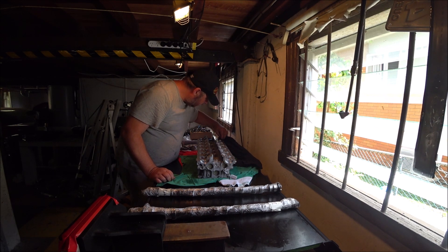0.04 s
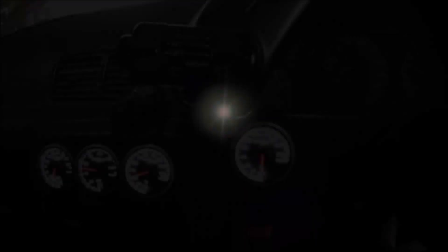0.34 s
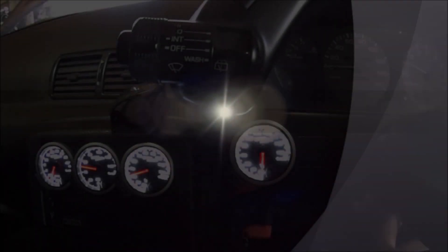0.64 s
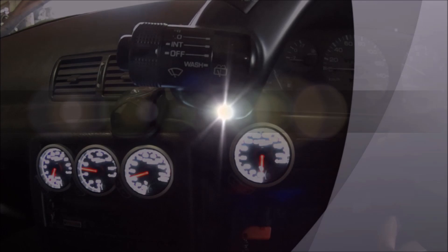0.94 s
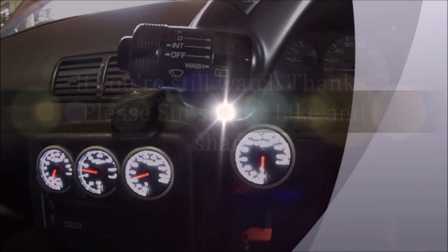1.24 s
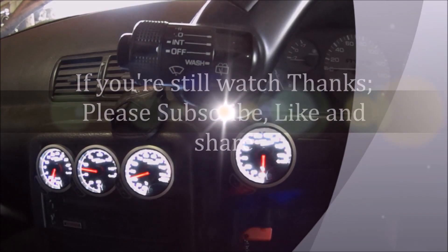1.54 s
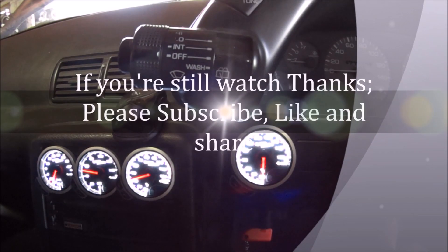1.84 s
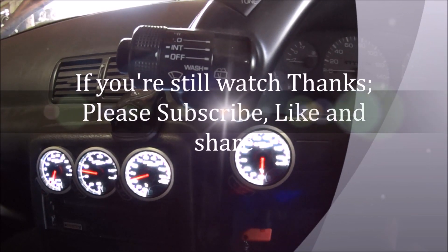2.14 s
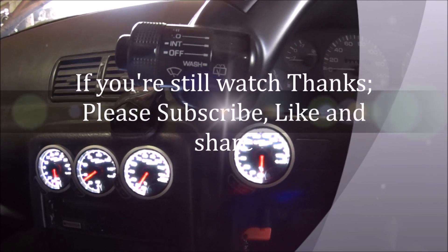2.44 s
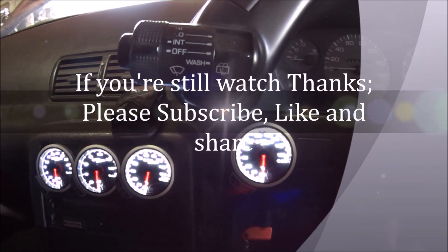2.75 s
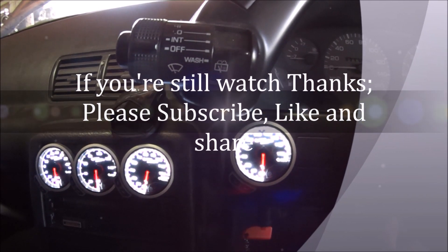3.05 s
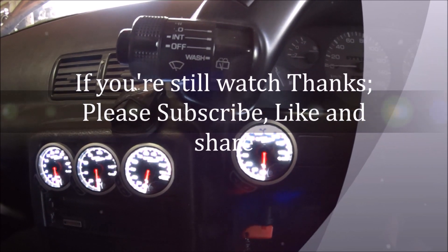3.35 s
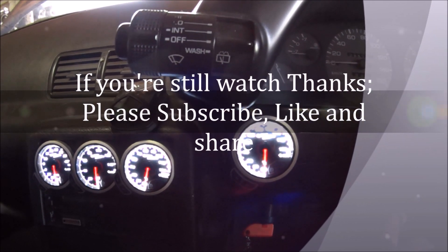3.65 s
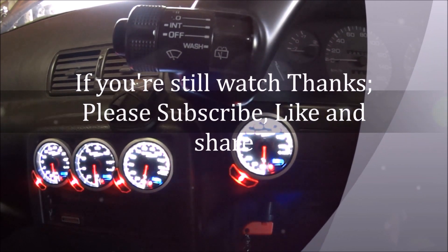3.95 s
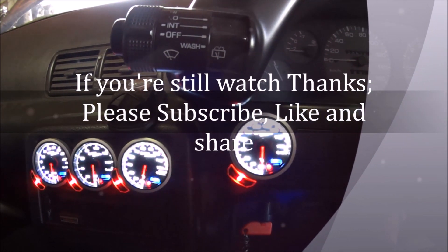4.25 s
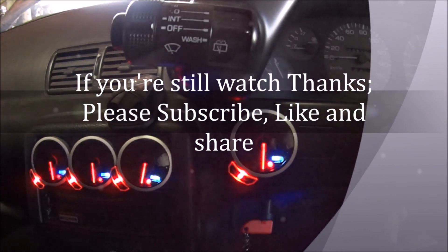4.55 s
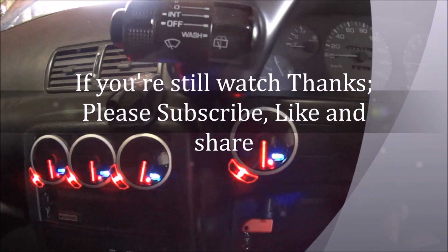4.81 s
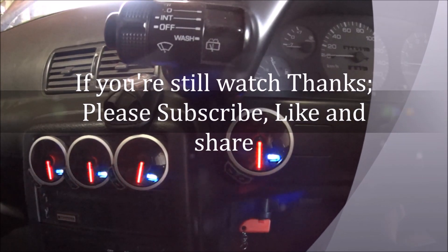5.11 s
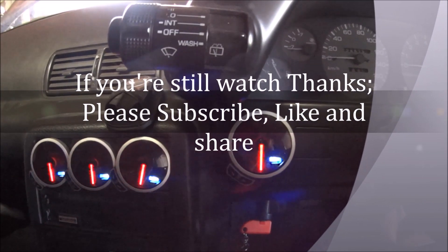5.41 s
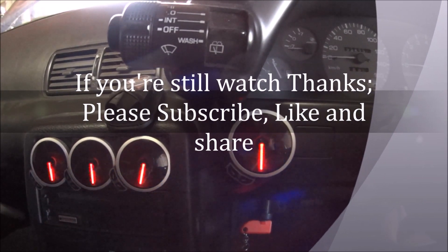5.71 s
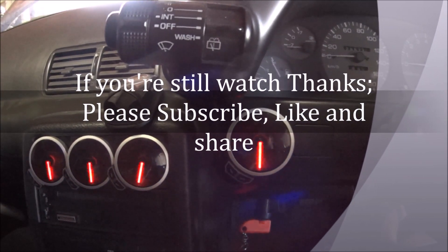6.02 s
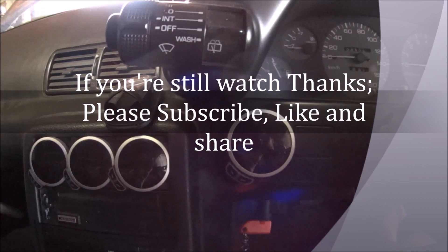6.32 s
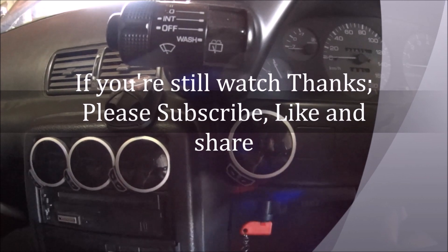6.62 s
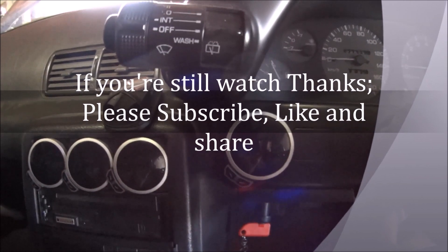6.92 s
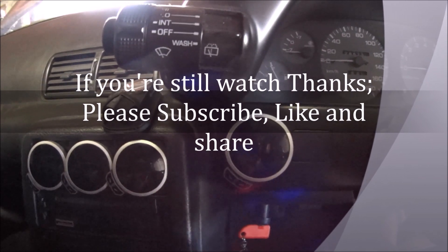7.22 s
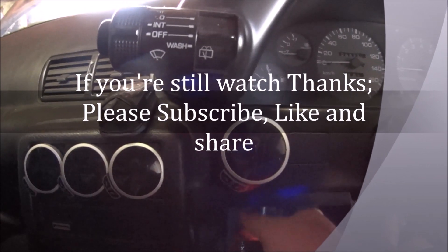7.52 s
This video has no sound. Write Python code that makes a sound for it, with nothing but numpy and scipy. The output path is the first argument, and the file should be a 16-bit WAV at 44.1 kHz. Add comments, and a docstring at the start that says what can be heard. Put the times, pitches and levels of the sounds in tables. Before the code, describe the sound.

A car engine idles, then shudders to a stop as it is switched off; the ignition clicks and hanging keys jangle.

```python
"""Switching off a parked car

Inside the cabin, after a faint hiss and a short silence, a six-cylinder engine idles. The key turns,
firing stops, and speed, clatter and intake hiss fall together as the engine shudders to rest.
The lock clicks through its notches, hanging keys jangle, trim creaks, a sleeve rustles, a relay ticks
and a latch clacks, over a faint hum from outside."""
import sys
import numpy as np
from scipy import signal
from scipy.fft import rfft, irfft
from scipy.io import wavfile
from scipy.ndimage import uniform_filter1d, map_coordinates

SR = 44100
rng = np.random.default_rng(int(sys.argv[2]) if len(sys.argv) > 2 else 0)


def store_wav(level_fs):
    """Save 16-bit WAV to argv[1]."""
    pcm = np.round(np.clip(np.atleast_2d(level_fs), -1, 1) * 32767)
    wavfile.write(sys.argv[1], SR, pcm.T.astype(np.int16))


N = 338158
TIME, HZ = np.arange(N) / SR, np.fft.rfftfreq(N, 1 / SR)
KEY_OFF_S, COAST_START_S, REST_S = 2.11, 2.148, 3.28
SETTLE_S = 0.34  # jolts and whir fade over this last stretch before rest

# engine balance at the ears: (frequency [Hz], left minus right [dB])
EAR_BALANCE = [(60, -2), (110, -9), (190, -2), (340, -5), (610, 2), (1090, -1.5), (1940, -2), (3460, -3.5),
               (6180, -2.0), (11000, -1)]
# engine phase at the ears: (frequency [Hz], left lead [rad])
EAR_LEAD = [(20, 2), (58, 0.79), (120, -0.7), (215, 1.5), (430, 1.23), (1120, 1.26), (2760, 0.62),
            (4130, -0.8), (11000, -1.3)]


def amp(db):
    """Decibels to gain."""
    return 10 ** (np.asarray(db) / 20)


def rms(x):
    """Root mean square, never zero."""
    return np.sqrt(np.mean(x ** 2) + 1e-20)


def unit(x):
    """Scale to rms 1."""
    return x / rms(x)


def read(points, hz):
    """Interpolate on a log-frequency axis."""
    f, value = np.transpose(points)
    return np.interp(np.log(hz + 1), np.log(f + 1), value)


def humps(peaks):
    """Resonance peaks as a spectrum in dB."""
    return sum(db / (1 + (2 * (HZ - hz) / width_hz) ** 2) for hz, width_hz, db in peaks)


def envelope(points):
    """Smoothed gain from a dB curve, silent outside its span."""
    s, db = np.transpose(points)
    return uniform_filter1d(np.interp(TIME, s, amp(db), left=0, right=0), size=400)


def swells(moves):
    """Summed gain of movements, each a linear rise and fall."""
    return sum(amp(db) * np.clip(np.minimum((TIME - s) / rise_s, 1 - (TIME - s - rise_s) / fall_s), 0, 1)
               for s, rise_s, fall_s, db in moves)


def add(mix, s, sound):
    """Mix a stereo sound in at time s."""
    part = mix[:, round(s * SR):][:, :sound.shape[1]]
    part += sound[:, :part.shape[1]]


def drift(hz):
    """Random wander of rms 1, up to about the given rate."""
    return unit(irfft(rfft(rng.standard_normal(N)) * np.exp(-(HZ / hz) ** 2), N))


def noise(shape_db, coherence, balance_db=0, lead_rad=0):
    """Shaped stereo noise; its mid has rms 1."""
    left, other = rfft(rng.standard_normal((2, N)))
    coherence = np.clip(coherence, -1, 1)
    right = coherence * left + np.sqrt(1 - coherence ** 2) * other
    pan = amp(balance_db / 2) * np.exp(.5j * lead_rad)
    pair = irfft(np.array([left * pan, right / pan]) * amp(shape_db), N)
    return pair / rms(pair.mean(0))


def burst(lo_hz, hi_hz, t60_s):
    """Decaying band of contact noise, nearly alike at both ears."""
    t = np.arange(SR // 2) / SR
    band = signal.butter(2, [lo_hz, min(hi_hz, SR / 2 - 1)], "band", fs=SR, output="sos")
    mid, side = unit(signal.sosfilt(band, rng.standard_normal((2, len(t)))))
    pair = np.array([mid + 0.36 * side, mid - 0.36 * side])
    return pair * amp(-60 * t / t60_s) * (1 - np.exp(-t / 0.00068))


def ring(modes, scatter_db=2, spread_rad=0.93, rise_s=.0011):
    """Decaying modes; each blow lands elsewhere and weights them differently."""
    t = np.arange(SR // 2) / SR
    out = np.zeros((2, len(t)))
    for hz, db, t60_s in modes:
        phase = 2 * np.pi * rng.random() + spread_rad * rng.standard_normal((2, 1))
        decay = amp(db + scatter_db * rng.standard_normal() - 60 * t / t60_s)
        out += decay * np.sin(2 * np.pi * hz * t + phase)
    return out * (1 - np.exp(-t / rise_s))


def opening_hiss(end_s=.267):
    """Faint, wide hiss that cuts off."""
    # hiss spectrum: (frequency [Hz], relative density [dB])
    spectrum = [(35, -62), (60, -21), (351, -13), (383, -5), (427, -8), (804, -6.5), (957, -9), (1110, -5),
                (11000, -17), (14300, -40), (22000, -120)]
    return amp(-63) * noise(read(spectrum, HZ), coherence=0.12) * (TIME < end_s)


def halvings(s, tau_s=.66):
    """Times the crank speed has halved by time s; friction slows it exponentially."""
    return (np.clip(s, COAST_START_S, REST_S) - COAST_START_S) / tau_s / np.log(2)


def crank_order(k, turns, crank_hz, offset_cycles):
    """Harmonic k of the crank, reaching the ears through the cabin's standing waves."""
    hz = k * crank_hz
    pan = amp(read(EAR_BALANCE, hz) / 2) * np.exp(.5j * read(EAR_LEAD, hz))
    return (np.array([pan, 1 / pan]) * np.exp(2j * np.pi * (k * turns + offset_cycles))).real


def idle(turns, crank_hz, roughness=.028):
    """Firing orders; unequal firings and surging turns blur the high ones most."""
    # idle harmonics: (order [x crank speed], relative level [dB])
    orders = [(2, -24), (3, 0), (4, -21), (5, -22), (6, -14.5), (8, -28), (9, -16), (10, -23), (11, -8),
              (12, -5.8), (13, -16.5), (15, -28), (16, -27), (17, -29), (18, -20), (19, -24), (21, -23),
              (23, -28), (24, -24), (33, -26)]
    surge = drift(11)
    out = np.zeros((2, N))
    for k, db in orders:
        flutter = 1 + roughness * np.sqrt(k) * (drift(33) + surge)
        out += amp(db) * flutter * crank_order(k, turns, crank_hz, rng.random())
    return amp(-31) * out / rms(out.mean(0))


def clatter_and_intake(turns, bleed_start_s=2.84, bleed_s=1):
    """Pulsing clatter and intake hiss fall with speed, then fade as the last air bleeds in."""
    # clatter through the bulkhead: (frequency [Hz], relative density [dB])
    clatter_spectrum = [(12, -25), (26, 5), (45, -2), (66, 5), (90, -3), (125, -5), (170, -5), (240, 2),
                        (272, -3), (320, 2), (385, 1.5), (425, -3), (500, -2), (700, -1.5), (1000, -8),
                        (1800, -12.5), (3000, -20), (5500, -38)]
    # intake air: (frequency [Hz], relative density [dB])
    hiss_spectrum = [(2000, -16), (3300, -2), (4300, -2), (5800, 0), (7200, -4), (10400, -15), (12000, -28)]
    # body panel resonances: (frequency [Hz], width [Hz], boost [dB])
    panels = [(204, 18, 13), (640, 60, 3), (750, 45, 4), (1755, 60, 6.5), (2210, 70, 2), (5500, 400, 2),
              (6380, 90, 3), (6870, 90, 3)]
    # left-right likeness: (frequency [Hz], coherence [0-1])
    coherence = [(60, 0.72), (130, 0.84), (270, 0.82), (560, 0.97), (1180, 0.8), (2490, 0.5), (5240, 0.91),
                 (11000, 1)]
    ears = read(coherence, HZ), read(EAR_BALANCE, HZ), read(EAR_LEAD, HZ)
    slowed = halvings(TIME)
    pulse = 1 + 0.052 * np.cos(2 * np.pi * 3 * turns) + 0.05 * np.cos(2 * np.pi * 2 * turns)
    clatter = noise(read(clatter_spectrum, HZ) + humps(panels), *ears) * amp(-40 - 10.5 * slowed)
    hiss = noise(read(hiss_spectrum, HZ) + humps(panels), *ears) * amp(-57.5 - 4.5 * slowed)
    return (clatter * pulse + hiss) * np.clip(1 - (TIME - bleed_start_s) / bleed_s, 0, 1)


def engine(idle_stroke_hz=57.8, wander=.002, stumble=0.03, firing_fade_s=0.09):
    """Six cylinders, three strokes a turn: fires until key-off, then coasts ever more unevenly."""
    slowed = halvings(TIME)
    stroke_hz = idle_stroke_hz / 2 ** slowed * (1 + wander * drift(3.64) + stumble * slowed * drift(15.7))
    strokes = np.cumsum(stroke_hz) / SR
    turns, crank_hz = strokes / 3, stroke_hz / 3
    firing = np.clip(1 - (TIME - KEY_OFF_S) / firing_fade_s, 0, 1)
    fired = idle(turns, crank_hz) * firing
    unfired = (compression(turns, crank_hz) + whir(turns, crank_hz)) * np.sqrt(1 - firing ** 2)
    return fired + unfired + clatter_and_intake(turns) + shudder(strokes)


def background(settle_db_per_s=16.5):
    """Hollow cabin quiet and a low rumble that settles as the body stops rocking."""
    # cabin quiet: (frequency [Hz], relative density [dB])
    spectrum = [(20, -42), (55, -4.5), (85, -9), (120, -3), (155, -15), (195, -5.5), (280, -15), (420, -16),
                (520, -13), (630, -13), (800, -16), (1300, -21), (2500, -26), (6000, -29.5), (11000, -36.5),
                (13000, -96)]
    # its resonances: (frequency [Hz], width [Hz], boost [dB])
    hollow = [(635, 36, 7), (4260, 80, 7)]
    # left-right likeness: (frequency [Hz], coherence [0-1])
    coherence = [(60, 0.98), (170, 1), (480, 0.55), (1370, 0.024), (3890, 0.065), (11000, 0.74)]
    rumble_db = read([(10, -18), (25, -15), (46, 1), (70, -41), (140, -16), (400, -80)], HZ)
    rocking = amp(-62 - settle_db_per_s * np.maximum(TIME - REST_S, 0))
    rumble = noise(rumble_db, coherence=1) * np.hypot(amp(-77.5), rocking)
    return rumble + amp(-63) * noise(read(spectrum, HZ) + humps(hollow), read(coherence, HZ))


def click(treble_db, middle_db, low_db, t60_s, treble_hz=5300):
    """Contact of small hard parts, in three noise bands."""
    treble = amp(treble_db) * burst(treble_hz / 1.7, treble_hz * 1.7, t60_s)
    return treble + amp(middle_db) * burst(1220, 3060, t60_s) + amp(low_db) * burst(330, 1140, t60_s)


def barrel(centre_hz):
    """The lock barrel rings most in the modes near the blow's centre frequency."""
    # barrel modes: (frequency [Hz], level [dB], t60 [s])
    modes = [(1250, -13, .09), (1772, 0.5, 0.068), (2825, 0, 0.044), (4390, -2.5, 0.049), (4660, -13, .025),
             (4980, -4, .035), (5830, -8, 0.031), (6090, -1, 0.029), (6680, -3, 0.033), (7270, -5, .036),
             (10620, -1.5, 0.03)]
    excited = [(hz, db - 6 * np.log2(hz / centre_hz) ** 2, t60_s) for hz, db, t60_s in modes]
    return ring(excited, scatter_db=-1, spread_rad=0.21)


def lock(seat_delay_s=0.0029):
    """The pin snaps into each notch, rings the barrel, seats with a duller blow and rattles in its slack."""
    # notches: (time [s], snap [dB], snap centre [Hz], seating [dB], ringing [dB], t60 [s])
    notches = [(2.1006, -28.5, 9200, -38, -40, 0.062), (2.613, -41.5, 7400, -66, -56, 0.08),
               (3.4245, -33.5, 4300, -38, -29.5, 0.084), (4.5654, -30.5, 6000, -44.5, -33, 0.033),
               (4.8151, -46, 5740, -42.5, -44, 0.056)]
    # catches and rebounds of the pin: (time [s], level [dB], centre [Hz])
    slack = [(2.088, -39.5, 9500), (3.4058, -47.5, 5200), (3.456, -44, 4000), (4.803, -54, 6500),
             (4.836, -50.5, 4400), (4.846, -51, 5000)]
    out = np.zeros((2, N))
    for s, snap_db, hz, seat_db, ring_db, t60_s in notches:
        snap = click(snap_db - 2, snap_db - 14, snap_db - 21, t60_s, hz)
        add(out, s, snap + amp(ring_db) * barrel(hz))
        add(out, s + seat_delay_s, click(seat_db - 2, seat_db, seat_db - 9, t60_s))
    for s, db, hz in slack:
        add(out, s, click(db - 2, db - 9, db - 21, t60_s=0.06, treble_hz=hz) + amp(db - 6) * barrel(hz))
    return out


def compression(turns, crank_hz, imbalance_db=-17, roughness=.22):
    """Harmonics of the unfired strokes sweep down through the cabin's deepest boom."""
    # stroke strength: (time [s], level [dB])
    strength = [(2.13, -32), (2.2, -27), (2.29, -27.5), (2.35, -34.5), (2.45, -36), (2.55, -29.5),
                (2.72, -35.5), (2.84, -44), (2.95, -45.5), (3.08, -57), (3.3, -72)]
    # cabin response: (frequency [Hz], gain [dB])
    response = [(12, -8), (18, 1), (26, 1), (36, 2.5), (46, 7.5), (56, 9.5), (66, 6), (80, -3), (100, -11),
                (120, -14), (200, -28), (400, -45)]
    out, power = np.zeros((2, N)), 0
    for k in range(2, 19):
        between = k % 3 != 0  # unlike cylinders add orders between the stroke harmonics
        gain = amp(read(response, k * crank_hz) + (imbalance_db if between else 0))
        flutter = 1 + roughness * drift(18)
        out += gain * flutter * crank_order(k, turns, crank_hz, rng.random() if between else 0)
        power += gain ** 2 / 2
    return out * envelope(strength) / np.sqrt(power)


def whir(turns, crank_hz, roughness=0.37):
    """Orders of the coasting crank and valve gear glide down through the cabin's booms."""
    # cabin response: (frequency [Hz], gain [dB])
    response = [(95, -25), (145, -7.5), (180, -14), (208, 2.5), (235, -4), (270, -19), (320, -15.5),
                (385, -4), (430, -25), (700, -24), (900, -37)]
    out = np.zeros((2, N))
    for k in range(6, 41):
        gain = amp(read(response, k * crank_hz)) * (1 + roughness * drift(26))
        out += gain * crank_order(k, turns, crank_hz, rng.random())
    return out * amp(-38 - 14 * halvings(TIME)) * np.clip((REST_S - TIME) / SETTLE_S, 0, 1)


def shudder(strokes, scatter_db=3):
    """Each unfired stroke jolts the body and rings the cabin air; the jolts slow into chugs."""
    # cabin air modes: (frequency [Hz], level [dB], t60 [s])
    booms = [(144.7, 2, 0.18), (201.8, -3, 0.18), (225, -5, 0.062), (383, -6, 0.085)]
    out = np.zeros((2, N))
    stroke_s = TIME[1:][np.diff(np.floor(strokes)) > 0]
    for s in stroke_s[(stroke_s > COAST_START_S) & (stroke_s < REST_S)]:
        jolt = amp(-42 - 4 * halvings(s) + scatter_db * rng.standard_normal())
        add(out, s, jolt * min((REST_S - s) / SETTLE_S, 1) * ring(booms))
    return out * amp([[1], [-1]])


def keys(detune=.009, mean_bounce_s=.009, bounce_db=-8, unstruck_db=-17):
    """Each touch of the hanging keys ticks, rings the struck parts most and bounces once."""
    # touches: (time [s], tick [dB], ringing [dB], parts struck)
    touches = [(2.468, -59, -49, "long"), (3.4623, -36, -45, "long ring"), (3.4835, -54, -55, "long"),
               (4.6605, -64, -67, "long"), (4.7093, -52, -64, "long"), (4.944, -45.5, -53, "long"),
               (4.9748, -45.5, -53, "long"), (5.0095, -45.5, -55, "long"), (5.077, -55, -58, "long"),
               (5.128, -50, -67, "long"), (6.038, -56.5, -61, "long"), (6.0805, -57, -57, "long"),
               (6.118, -45, -38, "long"), (6.1501, -40, -33, "long ring"), (6.1756, -48, -36, "long"),
               (6.1946, -43, -37, "long"), (6.248, -37, -30.5, "short small"),
               (6.3012, -37.5, -33.5, "long short small"), (6.3182, -40, -37.5, "long"),
               (6.357, -39, -31.5, "long small"), (6.388, -43, -42, "long"), (6.459, -42, -36, "ring"),
               (6.4955, -45, -45, "ring"), (6.5845, -54, -48, "ring"), (6.6052, -44, -34.5, "ring"),
               (6.6934, -48.5, -51, "long")]
    # modes of three keys and their ring: (frequency [Hz], level [dB], t60 [s])
    long_key = [(3500, -30, 0.15), (5160, -20, 0.049), (5550, 2, 0.045), (5640, -8, 0.083),
                (10720, -21, 0.1)]
    short_key = [(8479, -23, .38), (9315, -7.5, .15)]
    small_key = [(10532, -2.5, .17), (10585, -10, .07)]
    key_ring = [(7330, -35, .08), (10300, -31, 0.067), (10070, -6.5, 0.092)]
    # one key swinging free: (frequency [Hz], level [dB], t60 [s])
    free_key = [(4185, -58.5, .55)]
    ticks, rings = np.zeros((2, 2, N))
    for s, tick_db, ring_db, struck in touches:
        pitch = 1 + detune * rng.standard_normal()  # the long keys are not quite alike
        detuned = [(hz * pitch, db, t60_s) for hz, db, t60_s in long_key]
        parts = {"long": detuned, "short": short_key, "small": small_key, "ring": key_ring}
        for hit_s, hit_db in [(s, 0), (s + mean_bounce_s * (.5 + rng.random()), bounce_db)]:
            tick = amp(-4) * burst(4400, 8700, t60_s=0.032) + amp(-3) * burst(8600, 15300, t60_s=0.032)
            add(ticks, hit_s, amp(hit_db + tick_db) * tick)
            for name, modes in parts.items():
                part_db = (-1 if name == "long" else 0) + (0 if name in struck else unstruck_db)
                add(rings, hit_s, amp(hit_db + ring_db + part_db) * ring(modes, spread_rad=0.2))
    out = ticks + rings * (1 + .35 * drift(130))  # grazing keys make the ringing stutter
    add(out, 6.5, ring(free_key))
    return out


def trim_bumps():
    """Dull bumps ring the trim, each with a noisy thud."""
    # bumps: (time [s], level [dB], pitch [ratio])
    bumps = [(2.6205, -40, 0.73), (7.46, -54.5, 0.57), (7.606, -59, 0.39), (7.654, -37.5, 0.99)]
    # trim modes: (frequency [Hz], level [dB], t60 [s])
    modes = [(545, -4, 0.04), (705, 5, 0.05), (835, 4, 0.05), (925, 5, 0.04)]
    out = np.zeros((2, N))
    for s, db, pitch in bumps:
        ringing = ring([(hz * pitch, mode_db, t60_s) for hz, mode_db, t60_s in modes])
        add(out, s, amp(db) * (ringing + amp(-4) * burst(420, 870, t60_s=0.12)))
    return out


def sway():
    """The body heaves on its springs with a deep, soft thud."""
    # heaves: (start [s], rise [s], fall [s], level [dB])
    heaves = [(2.66, 0.12, 0.36, -41), (6.85, 0.096, .08, -54.5)]
    shape_db = read([(8, -25), (20, 7), (35, -6), (60, -3.5), (100, -27), (300, -55)], HZ)
    return noise(shape_db, coherence=0.88) * swells(heaves)


def trim_creaks():
    """Plastic round the column ticks and creaks, each spot at its own pitch."""
    # creaks: (time [s], level [dB], centre [Hz], t60 [s])
    creaks = [(2.872, -58.5, 1950, 0.24), (3.183, -58, 1700, 0.045), (4.405, -63, 2320, 0.058),
              (4.749, -51, 1080, 0.054), (4.817, -46.5, 950, 0.033), (6.151, -56, 796, 0.11),
              (6.213, -46.5, 517, 0.066), (6.665, -46, 1000, 0.012), (6.771, -57, 1590, 0.33),
              (6.953, -51, 1220, 0.11), (7.393, -54, 1420, 0.059), (7.41, -50, 1500, 0.028),
              (7.46, -63, 700, 0.045)]
    out = np.zeros((2, N))
    for s, db, hz, t60_s in creaks:
        add(out, s, amp(db) * (burst(hz / 1.51, hz * 1.51, t60_s) + amp(-20) * burst(2950, 7800, t60_s)))
    return out


def sleeve(grain=0.12, warp_s=.0015):
    """Cloth slides with a fine grain; the resonances it scrapes waver as the arm moves."""
    # arm movements: (start [s], rise [s], fall [s], level [dB])
    moves = [(3.4, 0.19, 0.23, -61), (3.93, 0.11, 0.26, -65.5), (4.96, 0.16, 0.3, -62.5),
             (6.72, 0.2, 0.64, -58), (7.4, 0.24, 0.26, -49.5)]
    # cloth friction: (frequency [Hz], relative density [dB])
    spectrum = [(120, -5), (200, 3.5), (348, -10), (418, 4.5), (495, -6), (615, 3), (727, -4), (1570, -6),
                (3020, -9.5), (5820, -9), (11000, -19), (14300, -55), (22000, -120)]
    # rubbed seat and trim: (frequency [Hz], width [Hz], boost [dB])
    resonances = [(1570, 110, 6), (2230, 100, 7), (5250, 170, 4), (5720, 110, 5), (6470, 160, 5),
                  (7540, 90, 7), (7910, 70, 8)]
    cloth = noise(read(spectrum, HZ) + humps(resonances), coherence=0.74)
    warped_index = (TIME + warp_s * drift(1.8)) * SR
    cloth = np.array([map_coordinates(ear, [warped_index], order=3, mode="mirror") for ear in cloth])
    return cloth * swells(moves) * (1 + grain * drift(120))


def distant_hum(waver=0.01016, fade_s=0.095):
    """Low, wavering tones come and go outside."""
    # hums: (start [s], end [s], pitch [Hz], level [dB])
    hums = [(3.804, 5.1, 119.8, -77), (5.38, 6.05, 115.7, -64), (6.098, 7.577, 115.3, -64.5),
            (6.537, 7.523, 94.5, -64)]
    out = np.zeros(N)
    for start_s, end_s, hz, db in hums:
        cycles = np.cumsum(hz * (1 + waver * drift(6.1))) / SR
        gate = np.clip(np.minimum(TIME - start_s, end_s - TIME) / fade_s, 0, 1)
        out += amp(db) * unit(np.sin(2 * np.pi * cycles)) * gate
    return out


def key_chain(touches_per_s=260, decay_s=0.015):
    """Tiny links tumble over each other in a scratchy shower of ticks."""
    # swings: (start [s], rise [s], fall [s], level [dB])
    swings = [(5.04, 0.083, 0.027, -75), (6.07, 0.17, 0.22, -54), (6.56, 0.037, 0.07, -55)]
    touches = (rng.random(N) < touches_per_s / SR) * (1 + rng.exponential(1, N))
    grains = unit(signal.lfilter([1], [1, -np.exp(-1 / (decay_s * SR))], touches))
    shape_db = read([(1000, -1.5), (2000, -3.5), (3500, -1), (6000, 0), (10500, -0.5), (12000, -27)], HZ)
    ticks = noise(0, coherence=0.78) * grains
    fizz = unit(irfft(rfft(ticks) * amp(shape_db), N))
    return amp(3) * fizz * swells(swings)


def relay(at_s=5.2308):
    """A relay behind the dash drops out with one dry tick."""
    # relay modes: (frequency [Hz], level [dB], t60 [s])
    modes = [(420, -52, 0.017), (805, -44, 0.022), (1250, -45, 0.037), (1870, -20, 0.0036),
             (2480, -42, 0.022), (4100, -43.5, 0.01), (6200, -47, .011)]
    out = np.zeros((2, N))
    add(out, at_s, ring(modes, scatter_db=-0.5, spread_rad=0.55, rise_s=0.00031))
    return out


def latch():
    """The latch springs in with a few quick blows on the steering column."""
    # blows: (time [s], level [dB])
    blows = [(6.2253, -21.5), (6.2375, -23.5), (6.2427, -20.5), (6.2468, -24)]
    # column modes: (frequency [Hz], level [dB], t60 [s])
    modes = [(515, -13, 0.023), (652, -36.5, 0.38), (990, -14, 0.038), (1250, -23, 0.13), (1640, 1, 0.011),
             (1755, 4, 0.02), (1988, 1, 0.041), (2200, -14, 0.056), (2260, -15, 0.12), (2720, -25.5, 0.15),
             (3420, -27, 0.14), (4400, -22, 0.17)]
    out = np.zeros((2, N))
    for s, db in blows:
        add(out, s, amp(db - 4) * ring(modes) + amp(db - 7) * burst(670, 6000, t60_s=0.022))
    return out


def cabin(x, wet_db=-11, t60_s=0.12):
    """Close glass and soft seats: dense early echoes that die quickly."""
    t = np.arange(SR // 4) / SR
    taps = rng.standard_normal((2, len(t))) * (rng.random((2, len(t))) < .1)
    taps *= (t > .002) * amp(-60 * t / t60_s)
    return x + amp(wet_db) * signal.fftconvolve(x, taps / np.linalg.norm(taps[0]), axes=1)[:, :N]


def scene(car_start_s=.3275):
    """Faint hiss, a gap, then the car."""
    handling = cabin(lock() + keys() + trim_bumps() + trim_creaks() + key_chain() + relay() + latch())
    handling *= amp([[-1.2], [1.2]])  # the ignition is to the right
    car = engine() + background() + handling + sway() + sleeve() + distant_hum()
    return opening_hiss() + car * np.clip((TIME - car_start_s) / .001, 0, 1)


def record(dry):
    """Steep low-pass on the top treble."""
    lowpass = signal.firwin(401, cutoff=11180, window=("kaiser", 9), fs=SR)
    return signal.oaconvolve(dry, lowpass[None], "same", axes=1)


dry = scene()
out = record(dry)
store_wav(out)
```